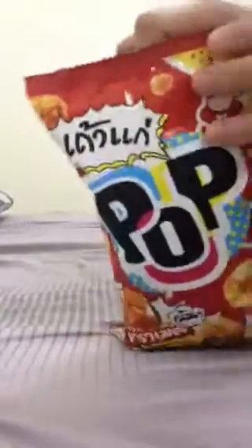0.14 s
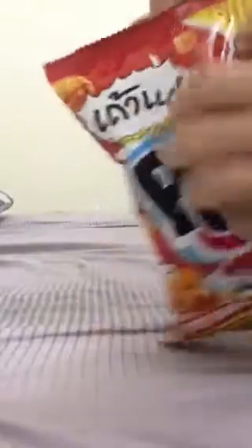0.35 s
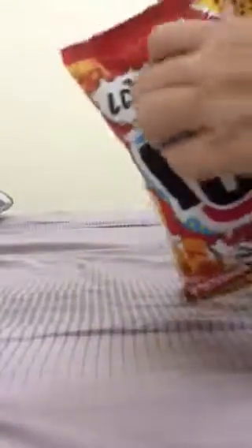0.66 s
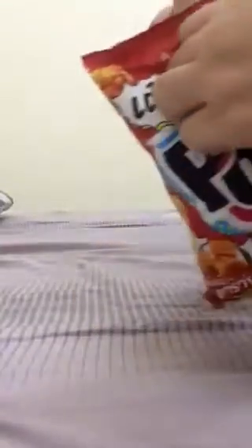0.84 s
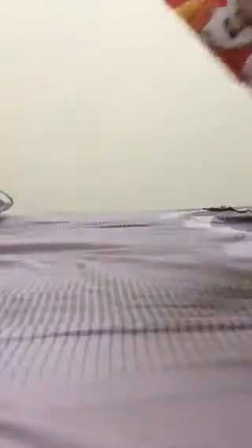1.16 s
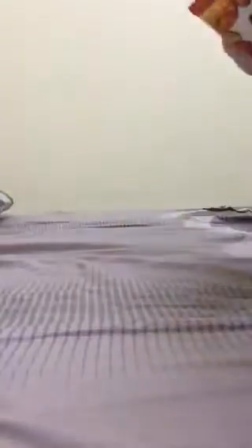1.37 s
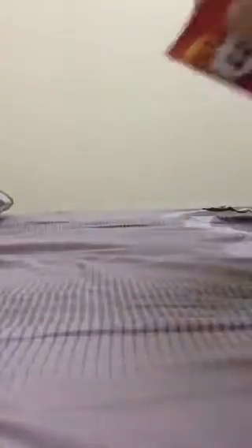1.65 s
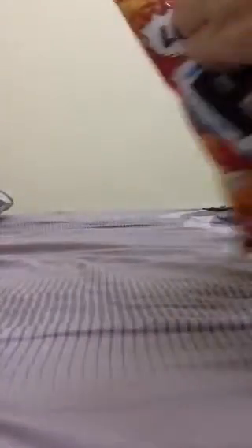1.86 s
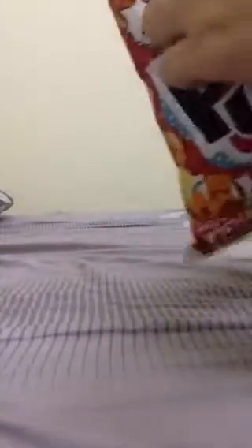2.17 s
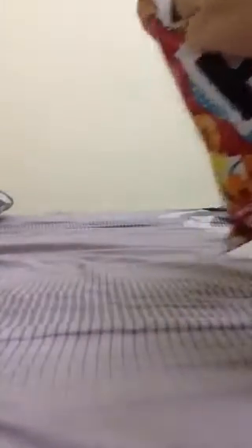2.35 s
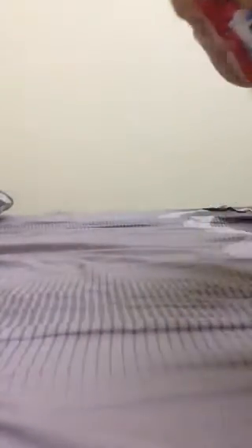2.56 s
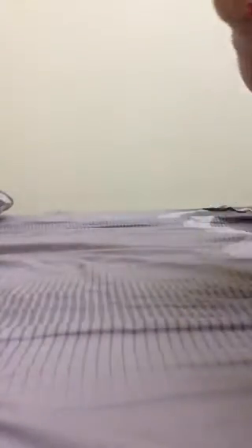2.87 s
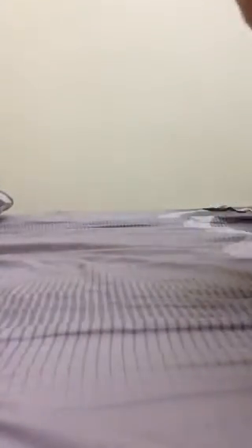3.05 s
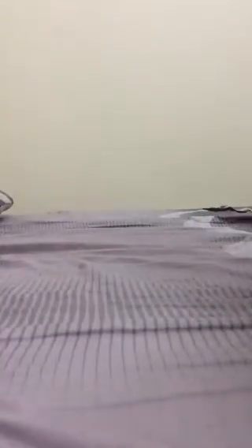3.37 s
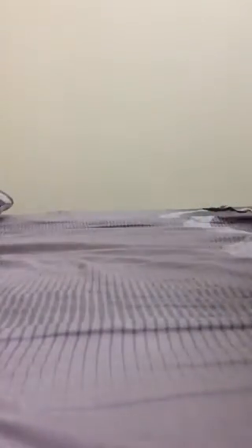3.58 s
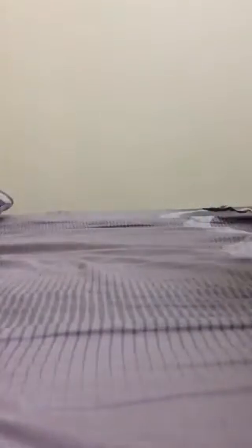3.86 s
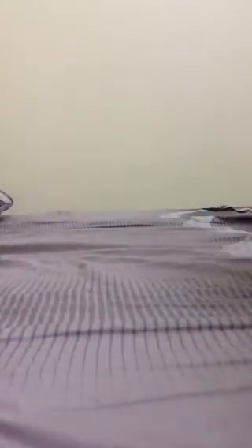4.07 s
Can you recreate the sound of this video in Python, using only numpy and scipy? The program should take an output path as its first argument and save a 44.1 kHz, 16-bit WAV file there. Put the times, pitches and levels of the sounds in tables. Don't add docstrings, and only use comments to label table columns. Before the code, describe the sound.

Hands crumple a crisp foil-like snack packet near the microphone, bright snapping creases and hissing film, thinning briefly, then louder snaps and a tear-like rustle.

```python
import sys
import numpy as np
from scipy import signal
from scipy.fft import rfft, irfft, next_fast_len
from scipy.io import wavfile
from scipy.ndimage import uniform_filter1d, map_coordinates

SR = 44100
rng = np.random.default_rng(int(sys.argv[2]) if len(sys.argv) > 2 else 0)


def store_wav(level_fs):
    pcm = np.round(np.clip(np.atleast_2d(level_fs), -1, 1) * 32767)
    wavfile.write(sys.argv[1], SR, pcm.T.astype(np.int16))


def decibels_to_gain(level_db):
    exponent = np.asarray(level_db, float) / 20
    return 10 ** exponent


N = 185705
SPAN = 4096
TYPICAL_DB = -20


def unit(x):
    return x / np.sqrt(np.mean(x ** 2) + 1e-20)


def along(points, hz):
    f, v = np.transpose(points)
    return np.interp(np.log(hz + 1), np.log(f + 1), v)


def curve(rows):
    return np.interp(np.arange(N) / SR, *np.transpose(rows))


def summed(*levels_db):
    return 10 * np.log10(sum(decibels_to_gain(2 * db) for db in levels_db) + 1e-12)


def wobble(knots_hz):
    knots = rng.standard_normal(int(N * 60 / SR) + 4)
    return map_coordinates(knots, [np.arange(N) * np.clip(knots_hz, 0, 60) / SR])


def filtered(x, spectrum):
    m = next_fast_len(N + 8192)
    gain = decibels_to_gain(along(spectrum, np.fft.rfftfreq(m, 1 / SR)))
    return irfft(rfft(x, m) * gain, m)[..., :N]


def mode(hz, width_hz):
    f = np.fft.rfftfreq(SPAN, 1 / SR)
    return 1j * f * width_hz / (hz * hz - f * f + 1j * f * width_hz)


def bursts(count, rise, blow_t60, t60, ring_db, settle_db, settle_t60):
    t = np.arange(SPAN) / SR
    lumps = np.repeat(decibels_to_gain(5.45 * rng.standard_normal((count, SPAN // 64))), 64, axis=1)
    crumble_db = 3.23 * rng.standard_normal((count, 1))
    blow = decibels_to_gain(-60 * t / blow_t60)
    rattle = decibels_to_gain(ring_db + crumble_db - 60 * t / t60 * decibels_to_gain(-crumble_db))
    settling = lumps * decibels_to_gain(settle_db - 60 * t / settle_t60)
    onset = 1 - np.exp(-t / rise)
    noise = rng.standard_normal((count, SPAN))
    return rfft(noise * onset * (blow + rattle + settling) * (t < .08))


def laid(spectra, s, peak_db):
    rows = irfft(spectra, SPAN)
    rows = rows * (decibels_to_gain(peak_db) / np.abs(signal.hilbert(rows)).max(1))[:, None]
    at = np.round(s * SR).astype(int)[:, None] + np.arange(SPAN)
    return np.bincount(at.clip(0).ravel(), rows.ravel(), N + SPAN)[:N]


# (frequency [Hz], level [dB per Hz])
AIR_SPECTRUM = [(15, -54), (25, -24.5), (206, 2), (416, -3.5), (503, -3), (1260, -78), (2610, -62),
                (14400, -86), (16000, -66)]
# (frequency [Hz], level [dB rms])
FAN_LINES = [(59, -76), (390, -70.5), (490, -61)]


def background():
    t = np.arange(N) / SR
    hum = 0
    for hz, db in FAN_LINES:
        level = decibels_to_gain(db + 3.0 + 0.64 * wobble(5.94))
        hum = hum + level * np.sin(2 * np.pi * hz * t + .8 * wobble(8.6))
    return hum + decibels_to_gain(-59) * unit(filtered(rng.standard_normal(N), AIR_SPECTRUM))


def bounce(x):
    return x + decibels_to_gain(-7) * np.pad(x, (round(SR / 4500), 0))[:N]


def patchy(patchy_db, size):
    z = signal.stft(rng.standard_normal(N), nperseg=256)[2]
    field = uniform_filter1d(rng.standard_normal(z.shape), size=size, axis=0)
    field = uniform_filter1d(field, size=24, axis=1)
    return signal.istft(z * decibels_to_gain(patchy_db * unit(field)), nperseg=256)[1][:N]


def grit(depth_db):
    return np.repeat(decibels_to_gain(depth_db * rng.standard_normal(N // 48 + 1)), 48)[:N]


def grains(count, level_db, centre_hz, octaves, t60, spread_db, order):
    draw = rng.random((count, 2))
    hz = np.clip(centre_hz * 2 ** (octaves * rng.standard_normal((count, 1))), 300, 14000)
    s = draw[:, 0] * (N - 1) / SR
    size_db = np.minimum(-spread_db * np.log(draw[:, 1] + 1e-9), 6)
    kick = bursts(count, rise=.0001, blow_t60=t60, t60=3 * t60, ring_db=-18.0, settle_db=-68, settle_t60=.05)
    peak_db = level_db[np.round(s * SR).astype(int)] + size_db
    return laid(kick * mode(hz, 0.61 * hz) ** order, s, peak_db)


def creep(s, peak_db, under_db, t60):
    build_s, follows = .001, .45
    t = np.arange(-SPAN, 4 * SPAN) / SR
    swell = np.where(t < 0, np.exp(t / build_s), decibels_to_gain(-120 * t / t60))
    start_db = TYPICAL_DB + follows * (peak_db - TYPICAL_DB) + under_db
    stir = np.bincount(np.round(s * SR).astype(int).clip(0, N - 1), decibels_to_gain(2 * start_db), N)
    return 10 * np.log10(np.abs(signal.fftconvolve(stir, swell)[SPAN:][:N]) + 1e-12)


# (frequency [Hz], level [dB per Hz])
POUCH_SPECTRUM = [(90, -28), (200, -5.5), (450, -8), (800, 0), (1200, -9.5), (2000, -26)]
FILM_SPECTRUM = [(900, -102), (1500, -2), (2400, 8), (3200, -2), (4500, -18.5), (6500, 2), (13000, -45)]
SLIDE_SPECTRUM = [(3000, -8.5), (4500, 2.5), (6300, -1), (9000, -2.5), (11200, 1.5), (14000, -4),
                  (15600, 3)]
# (time [s], level [dB])
PALM_PRESSURE = [(0, -35.5), (.06, -48), (.15, -29), (.25, -45.5), (.4, -48), (.45, -37), (.65, -41),
                 (.745, -53.5), (.9, -43), (1.1, -55), (1.76, -53.5), (1.82, -43), (2.45, -41), (2.6, -48),
                 (3.46, -50), (3.56, -35.5), (3.88, -47.5), (4.21, -50.5)]
# (time [s], level [dB])
FINGER_SPEED = [(0, -100), (.78, -62), (.89, -48), (1.1, -71), (1.39, -62), (1.74, -97), (1.82, -59),
                (2.6, -60), (2.9, -49.5), (3.0, -76), (3.105, -55), (3.2, -51), (3.36, -56), (3.45, -61),
                (3.6, -45), (3.93, -60.5), (3.955, -43), (4.14, -49.5)]


def handling():
    s, peak_db, _, _, edge_db = creases()
    pop_s, pop_db, _ = all_pops()
    squeeze_db, rub_db = curve(PALM_PRESSURE), curve(FINGER_SPEED)
    rest_db, pouch_follows = -37, 1
    pressed_db = rest_db + pouch_follows * (squeeze_db - rest_db) - 1
    pouch_db = summed(pressed_db, creep(pop_s, pop_db, under_db=-23.5, t60=0.1))
    film_db = summed(squeeze_db - 5, rub_db + 1, creep(s, peak_db, under_db=-24, t60=0.11))
    slide_db = summed(rub_db + 5, creep(s, peak_db + edge_db, under_db=-18, t60=0.023))

    grip = wobble(50)
    grip_db = 1.6 * grip
    rustle = unit(filtered(patchy(2.9, size=2), POUCH_SPECTRUM))
    rustle = rustle * decibels_to_gain(pouch_db - 5 + 3.46 * grip + 3.4 * wobble(45))
    rustle = rustle + grains(330, pouch_db + 6.0, centre_hz=520, octaves=0.4, t60=0.0071,
                             spread_db=-0.5, order=2)
    crackle = unit(filtered(grit(4) * patchy(2.5, size=5), FILM_SPECTRUM))
    crackle = crackle * decibels_to_gain(film_db - 4.0 + grip_db)
    crackle = crackle + grains(750, film_db + 6.0, centre_hz=3900, octaves=0.38, t60=0.0016,
                               spread_db=-0.5, order=1)
    slide = unit(filtered(patchy(1.0, size=6), SLIDE_SPECTRUM))
    slide = slide * decibels_to_gain(slide_db + grip_db + 1.2 * wobble(27.46))
    return rustle + bounce(crackle + slide)


# (time [s], peak [dB], facet ring [Hz], edge share [dB])
GRASP_CREASES = [(.0029, -14, 2470, 1.5), (.1162, -27, 5000, 4), (0.1232, -20, 5580, -4),
                 (0.1314, -15, 2440, -28), (.147, -10.5, 3140, -13), (0.213, -12.5, 5900, -6),
                 (0.216, -10.5, 4900, -16), (0.258, -13.5, 5170, -16), (0.266, -17.5, 4700, 1.5),
                 (0.279, -31, 6650, -13), (0.2958, -22.5, 2300, 2.5), (0.4196, -13.5, 5700, -5.5),
                 (0.4316, -14.5, 4840, 5), (0.53, -16.5, 4800, 1), (0.5412, -14, 4600, -16),
                 (0.544, -24, 3000, -2), (.559, -19, 6700, -13), (0.5714, -14, 5600, -8),
                 (0.5784, -18.5, 4050, 3), (0.586, -15.5, 4500, -10), (0.6253, -26, 2290, 3),
                 (0.63, -12.5, 6100, -6), (0.645, -21.5, 4360, 2), (0.6737, -20, 2830, 4),
                 (0.7005, -15.5, 3680, -1)]
LIFT_CREASES = [(0.7809, -13, 4070, -3), (0.787, -9, 5700, -4), (0.8182, -20, 4900, -12),
                (0.8262, -18, 6400, 0), (0.8322, -15, 4100, 0), (0.8741, -12.5, 5770, -6),
                (0.8827, -10, 5100, -0.5), (.981, -15, 6630, -31), (1.0265, -26, 4900, 1.5),
                (1.162, -16.5, 3900, -20), (1.175, -23.5, 2410, -2), (1.2456, -23.5, 2310, -20),
                (1.257, -31, 2370, -21), (1.323, -43, 4500, 6), (1.3806, -13.5, 5240, -7),
                (1.408, -13, 5100, -23), (1.4135, -25, 3470, -6), (1.517, -23.5, 3780, -6),
                (1.545, -16, 4630, -10), (1.5871, -23.5, 3750, -3), (1.625, -17, 5000, 0),
                (1.7579, -19, 3900, -11), (1.7905, -10, 4260, -7), (1.796, -21, 3900, -10),
                (1.8316, -28, 3850, 12), (1.836, -17, 4950, -1), (1.8453, -12.5, 4750, -5),
                (1.869, -21.5, 3770, 4.5), (1.9155, -19, 4750, 1)]
PINCH_CREASES = [(1.943, -7.5, 5500, -5), (1.958, -29, 2300, 9), (1.9902, -22, 7500, -20),
                 (2.1378, -17.5, 2420, -6), (2.188, -23.5, 5300, -14), (2.198, -17, 2160, -17),
                 (2.2175, -13, 3580, -5), (2.2237, -10.5, 4050, -4), (2.232, -11, 4200, -27),
                 (2.243, -15, 4200, -13), (2.2882, -24, 2700, -23), (2.338, -16, 2240, 1),
                 (2.3441, -11, 3540, -9), (2.3781, -15.5, 2350, -4), (2.4372, -6.5, 3850, 0.5),
                 (2.443, -8, 5640, 1), (2.5462, -19, 2540, 2), (2.65, -20.5, 3470, -18),
                 (2.6783, -8.5, 4460, -26), (2.747, -26, 4370, -12), (2.779, -18, 2200, -0.5),
                 (2.8364, -18, 3900, -7), (2.892, -21.5, 4200, 0.5), (2.8964, -19.5, 2880, 0),
                 (2.96, -22.5, 4520, -19), (3.03, -14, 4760, 0), (3.0898, -12.5, 3960, 3),
                 (3.1004, -17.5, 4500, -7), (3.1279, -2, 4460, -30)]
TEAR_CREASES = [(3.399, -19, 4100, -14), (3.42, -23, 3600, -14), (3.489, -34, 4770, 8),
                (3.5165, -20, 3220, 1), (3.539, -18, 2270, -30), (3.56, -18.5, 3300, 5.5),
                (3.5763, -24, 3830, -21), (3.585, -26, 3970, -14), (3.591, -18, 2480, 0),
                (3.6462, -18.5, 2500, 8), (3.6561, -13.5, 2380, -32), (3.6766, -11, 3850, 1.5),
                (3.6949, -13.5, 3990, 1), (3.7216, -19, 3020, 0.5), (3.731, -18, 3600, -23),
                (3.761, -17, 3980, 6.5), (3.9497, -17.5, 3900, -10), (4.003, -10, 7300, -21),
                (4.03, -20, 2460, 4.5), (4.04, -17.5, 4140, -16), (4.0572, -23, 3600, -27),
                (4.0982, -19.5, 3800, -17)]
# (time [s], peak [dB], facet ring [Hz])
SMALL_CREASES = [(.098, -29, 4730), (.228, -41, 4540), (.303, -24.5, 3420), (.314, -31, 2590),
                 (.4274, -20.5, 3780), (.4844, -19, 5300), (.5057, -28, 2520), (.6167, -27, 4270),
                 (.6698, -29, 2620), (1.018, -31, 5400), (1.1434, -31, 5500), (1.19, -26.5, 2360),
                 (1.207, -27.5, 2450), (1.6169, -28.5, 2640), (1.8099, -26, 5500), (1.967, -39, 4400),
                 (2.1457, -21.5, 5700), (2.1552, -23, 2350), (2.294, -23, 4500), (2.4799, -30, 2300),
                 (2.7524, -21.5, 2430), (3.14, -34, 3000), (3.4112, -28, 2210), (3.451, -29.5, 2470),
                 (3.7924, -24.5, 2470), (3.7997, -27, 3840), (3.8904, -26.5, 3780), (3.8959, -25.5, 3740),
                 (3.9551, -40, 4030)]


def creases():
    wall_shares_db = (-11.5, -17, -9.5, -9.5)
    small_edge_db, coupling_db, coupling_s = -10, -8, 0.011
    moves = [GRASP_CREASES, LIFT_CREASES, PINCH_CREASES, TEAR_CREASES]
    rows = [np.c_[move, np.full(len(move), db)] for move, db in zip(moves, wall_shares_db)]
    small_shares = np.tile([small_edge_db, wall_shares_db[0]], (len(SMALL_CREASES), 1))
    rows.append(np.c_[SMALL_CREASES, small_shares])
    s, peak_db, hz, edge_db, wall_db = np.vstack(rows).T
    pop_s, pop_db, _ = all_pops()
    nearness = np.exp(-((s[:, None] - pop_s) / coupling_s) ** 2)
    shaken = (decibels_to_gain(2 * pop_db) * nearness).sum(1)
    shaken_db = 10 * np.log10(shaken + 1e-12) - peak_db + coupling_db
    alone_db = wall_db + 2.5 * np.log2(3500 / hz) + 0.5 * rng.standard_normal(len(s))
    return s, peak_db, hz, summed(alone_db, shaken_db), edge_db


def snaps():
    s, peak_db, hz, body_db, edge_db = creases()
    hz = hz[:, None]
    rattle_db = -12 - .4 * (peak_db[:, None] - TYPICAL_DB)
    kick = bursts(len(s), rise=.00006, blow_t60=0.0011, t60=0.0092, ring_db=rattle_db,
                  settle_db=-38.0, settle_t60=0.22)
    s = s - .0004
    facet = mode(hz, .16 * hz) + decibels_to_gain(-4.5) * mode(4190, 2970) ** 2
    body = mode(2460, 2010) ** 2
    overtone_hz = np.clip(2 * hz, 8300, 11000)
    sharp_db = -4 + 5 * rng.standard_normal((len(s), 1))
    edge = mode(overtone_hz, 3440) ** 2 + decibels_to_gain(sharp_db) * mode(15160, 7400) ** 2
    out = laid(kick * facet, s, peak_db)
    out = out + laid(kick * body, s, peak_db + body_db)
    return out + laid(kick * edge, s, peak_db + edge_db)


def flicks(rows, blow_t60, damping):
    s, peak_db, hz = np.transpose(rows)
    kick = bursts(len(s), rise=.0001, blow_t60=blow_t60, t60=5 * blow_t60, ring_db=-4.5,
                  settle_db=-60, settle_t60=.05)
    ring = mode(hz[:, None], damping * hz[:, None]) * mode(hz[:, None], 1.32 * hz[:, None])
    return laid(kick * ring, s - 1 / hz, peak_db + 0.5)


# (time [s], peak [dB], facet ring [Hz])
FAINT_CREASES = [(0.0113, -24, 1480), (0.0186, -28, 1810), (0.0425, -31, 3800), (0.0774, -32, 1970),
                 (0.1637, -20.5, 1930), (0.1824, -23, 4890), (0.1894, -27, 2170), (0.2034, -30, 2450),
                 (0.2722, -23, 5100), (.2965, -25, 1390), (0.4422, -21.5, 4700), (0.4697, -36, 1850),
                 (0.5173, -36, 5040), (0.5347, -24.5, 2780), (.5445, -18, 1480), (0.5526, -33, 2940),
                 (0.5714, -27, 5300), (0.7633, -40, 5420), (0.9649, -36, 4790), (1.2122, -41, 1670),
                 (1.2365, -29, 2480), (1.3231, -24, 4600), (1.4535, -38, 2300), (1.5312, -29, 4250),
                 (1.8055, -35, 5110), (1.85, -25, 2010), (1.8787, -28, 2340), (1.9844, -29, 4550),
                 (2.005, -47, 4500), (2.0582, -36, 2220), (2.1071, -32, 2340), (2.1812, -29, 4260),
                 (2.1985, -33, 4300), (2.3377, -10, 6400), (2.3721, -37, 2170), (2.4058, -36, 2050),
                 (2.4593, -30, 2610), (2.8156, -41, 4500), (2.8787, -35, 3650), (2.8995, -41, 5140),
                 (3.103, -22, 3700), (3.2169, -39, 3970), (3.3571, -31.5, 3030), (3.5033, -32, 5250),
                 (3.5246, -27.5, 2270), (3.5689, -23, 2080), (3.6033, -32, 4230), (3.7408, -19, 4160),
                 (3.7808, -30, 4790), (3.8119, -28, 2980), (3.8319, -32, 3730), (3.924, -39, 2400),
                 (3.9665, -29, 7250), (3.9791, -29, 4230), (3.9945, -29, 3790), (4.195, -39, 2200)]


def faint_creases():
    return flicks(FAINT_CREASES, blow_t60=.0018, damping=.3)


# (time [s], peak [dB], pouch ring [Hz])
POUCH_POPS = [(.0127, -24.5, 676), (.1321, -16.5, 454), (.1475, -16, 690), (.1956, -17.5, 570),
              (.2074, -23, 1080), (.218, -20, 654), (.2959, -27.5, 615), (.4185, -18.5, 736),
              (.4265, -20.5, 800), (.4414, -17.5, 730), (.5206, -24, 980), (.5453, -28, 575),
              (.5786, -18, 1110), (.6287, -23.5, 734), (.6447, -22.5, 620), (.6758, -25.5, 840),
              (.7008, -22, 1220), (.7737, -21, 735), (.781, -25, 610), (.8309, -17, 710), (.8726, -9, 660),
              (.885, -20.5, 950), (1.1753, -24.5, 850), (1.1898, -23.5, 425), (1.2078, -23, 740),
              (1.2361, -28.5, 1090), (1.7906, -28.5, 286), (1.808, -22, 520),
              (1.827, -22.5, 940), (1.8352, -25, 660), (1.8509, -21.5, 980), (1.95, -30, 780),
              (1.959, -23, 690), (1.9731, -24, 880), (2.0321, -29, 550), (2.108, -25.5, 597),
              (2.1373, -24.5, 935), (2.2185, -16, 920), (2.2271, -17, 704), (2.337, -20.5, 980),
              (2.3781, -25, 865), (2.4365, -12, 754), (2.544, -31, 593), (2.6494, -19, 844),
              (2.68, -27.5, 950), (2.747, -26.5, 870), (2.8763, -26, 850), (3.003, -30, 840),
              (3.127, -23, 790), (3.2703, -23, 550), (3.502, -30, 288), (3.565, -20.5, 390),
              (3.6469, -34, 720), (3.6546, -16, 617), (3.6774, -22, 460), (3.977, -27, 640),
              (4.0288, -29.5, 458)]


def all_pops():
    return np.array(POUCH_POPS).T


def pops():
    s, peak_db, hz = all_pops()
    push = bursts(len(s), rise=0.00016, blow_t60=0.003, t60=0.022, ring_db=-8.5,
                  settle_db=-26.0, settle_t60=0.07)
    wall = mode(hz[:, None], 0.31 * hz[:, None]) + decibels_to_gain(-18.5) * mode(540, 430) ** 2
    soft = mode(350, 960)
    return laid(push * wall * soft, s - .0009, peak_db)


# (time [s], peak [dB], ring [Hz])
SEAM_CORNERS = [(.043, -37, 9400), (0.1982, -25, 8790), (0.2076, -23, 11000), (0.2177, -10, 12100),
                (0.2778, -26, 11600), (0.5406, -12.5, 12700), (0.6166, -29, 10410), (1.1901, -27, 9550),
                (1.2456, -21, 9200), (1.2565, -23, 8810), (1.3825, -20, 9460), (1.4129, -36, 8620),
                (1.6337, -33, 9030), (1.802, -30, 9510), (1.8084, -35, 9700), (1.8499, -26, 10620),
                (1.8557, -21, 13660), (1.9844, -36, 9700), (2.2273, -24, 12600), (2.3781, -8.5, 14850),
                (2.8142, -26, 13500), (2.8463, -39, 14350), (2.8565, -39, 12960), (2.9102, -32, 9750),
                (2.948, -29, 12360), (3.007, -35, 13000), (3.1561, -30, 8450), (3.5006, -21, 13840),
                (3.5246, -23, 14070), (3.6571, -19, 12750), (3.9637, -27, 13200),
                (3.1283, -7, 13200),
    (3.398, -29, 13500),
    (3.411, -31, 13000),
]


def seam_flicks():
    return flicks(SEAM_CORNERS, blow_t60=.0015, damping=.4)


# (time [s], peak [dB], ring [Hz])
WALL_DENTS = [(0.0778, -26, 556), (.1175, -24, 607), (0.1241, -21.5, 575), (0.1891, -21, 870),
              (0.2078, -24, 590), (0.218, -13.5, 720), (0.2662, -28, 555), (0.2779, -30, 590),
              (0.3141, -29.5, 530), (0.3651, -38.5, 730), (0.4308, -17, 804), (0.4855, -24, 930),
              (0.5063, -28, 1160), (0.5445, -25, 383), (0.5721, -30, 1240), (0.5889, -33, 740),
              (0.6457, -31, 603), (0.7869, -28, 576), (0.8222, -15.5, 1110), (0.9041, -28, 570),
              (1.1763, -31, 930), (1.4128, -31, 890), (1.7895, -21, 780), (1.8712, -29, 490),
              (1.9416, -25.5, 617), (1.9601, -15, 753), (2.0001, -29.5, 736), (2.1069, -31, 520),
              (2.1833, -31, 520), (2.493, -30.5, 620), (2.751, -39, 935), (2.8949, -28, 1100),
              (3.1638, -33, 940), (3.2987, -30, 520), (3.4527, -32, 476), (3.6948, -23.5, 550),
              (3.7214, -30, 625), (3.732, -30, 614), (3.7394, -31, 780), (3.7815, -30.5, 580),
              (3.7921, -48, 725), (4.0035, -35.5, 362), (4.0307, -38, 480), (4.102, -32, 437),
              (1.379, -34.5, 860),
    (1.548, -38, 503),
    (1.59, -38, 890),
    (1.671, -38, 600),
    (1.695, -38, 560),
]


def dents():
    return flicks(WALL_DENTS, blow_t60=.002, damping=.5)


# (time [s], peak [dB], breath [Hz])
BREATHS = [(0.15, -31.5, 215), (0.432, -29, 237), (0.542, -49, 219), (0.872, -32.5, 222),
           (1.795, -28.5, 152), (1.966, -29.5, 178), (2.437, -45, 200), (3.504, -38.5, 171),
           (3.577, -34, 203), (3.709, -36, 176), (4.038, -38, 160)]


def thuds():
    s, peak_db, hz = np.transpose(BREATHS)
    hz = hz * np.exp(.02 * rng.standard_normal(len(s)))
    push = bursts(len(s), rise=0.0035, blow_t60=0.016, t60=0.051, ring_db=0, settle_db=-40, settle_t60=0.14)
    breath = mode(hz[:, None], 52) ** 2 + decibels_to_gain(-8.5) * mode(220, 300) ** 2
    return laid(push * breath, s - .008, peak_db)


# (start [s], length [s], level [dB], hiss centre [Hz])
FILM_HISSES = [(1.354, 0.063, -47.5, 9300), (1.355, 0.047, -50, 4000), (2.75, 0.07, -54, 9200),
               (2.852, 0.14, -50.5, 13200), (3.024, 0.048, -45, 13100), (3.108, 0.031, -33, 14800),
               (3.158, 0.085, -43, 8900), (3.17, 0.11, -48, 4450), (3.26, 0.17, -49.5, 9100),
               (3.557, 0.07, -37.5, 3300), (3.558, 0.039, -38, 7340), (3.652, 0.081, -38, 3280),
               (3.718, 0.13, -45.5, 3330), (3.945, 0.15, -47.5, 3900), (3.95, 0.25, -47, 8060),
               (3.951, 0.17, -45, 12700), (4.09, 0.12, -41.5, 12600)]


def strokes():
    rub = unit(patchy(2, size=4) * decibels_to_gain(1.5 * wobble(55)) * grit(2.5))
    hz, t, z = signal.stft(rub, SR, nperseg=256)
    power = 0
    for s, length_s, db, centre_hz in FILM_HISSES:
        on = np.clip((t - s) / .006, 0, 1) * np.clip((s + length_s - t) / (.5 * length_s), 0, 1)
        width_hz = .075 * centre_hz + 550
        band = np.exp(-.5 * ((hz - centre_hz) / width_hz) ** 2)
        power = power + decibels_to_gain(2 * db) * np.outer(band ** 2 / np.mean(band ** 2), on ** 2)
    return signal.istft(z * np.sqrt(power), SR, nperseg=256)[1][:N]


def scene():
    bag = handling() + snaps() + faint_creases() + pops() + seam_flicks() + dents() + thuds() + strokes()
    return (background() + bag)[None]


def low_pass(x):
    return signal.sosfilt(signal.butter(12, 16490, fs=SR, output="sos"), x)


# (frequency [Hz], level [dB])
BAND_EDGE = [(15150, -1.5), (15450, -43), (16400, -44), (16600, -90)]


def record(dry):
    heard = filtered(dry, BAND_EDGE)
    return low_pass(heard)


dry = scene()
out = record(dry)
store_wav(out)
```